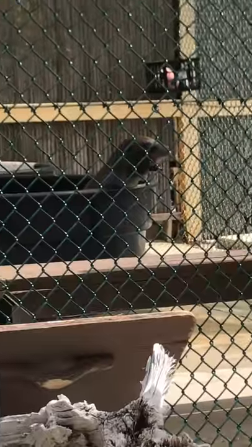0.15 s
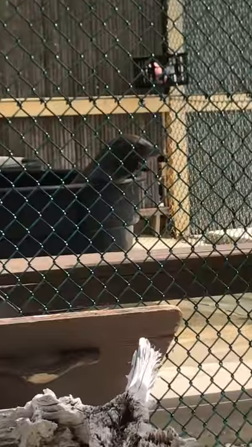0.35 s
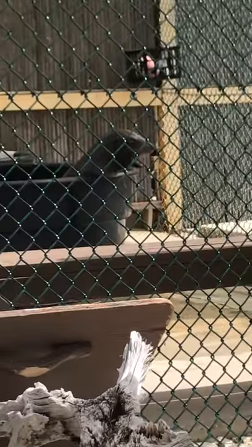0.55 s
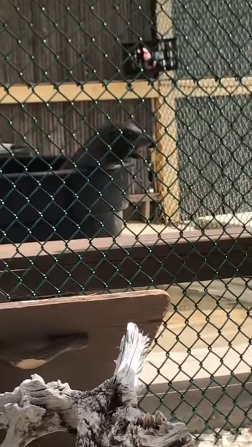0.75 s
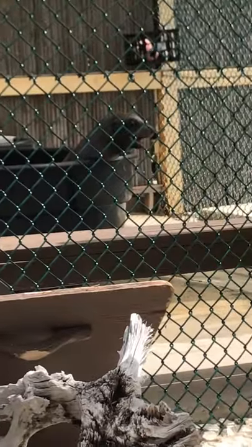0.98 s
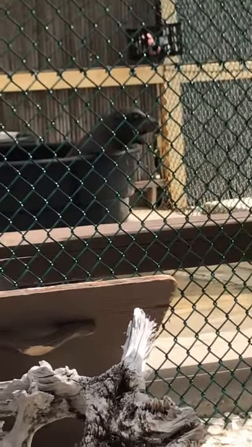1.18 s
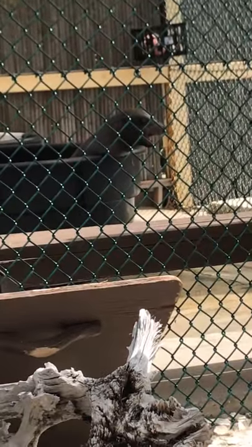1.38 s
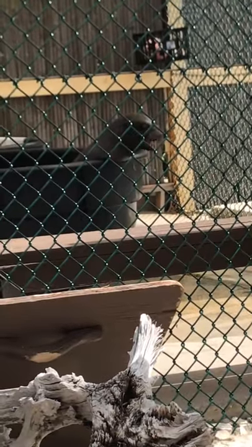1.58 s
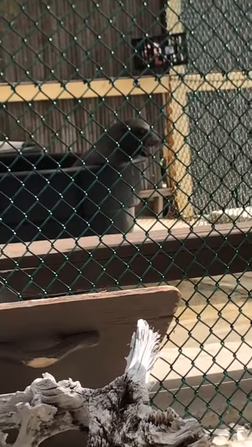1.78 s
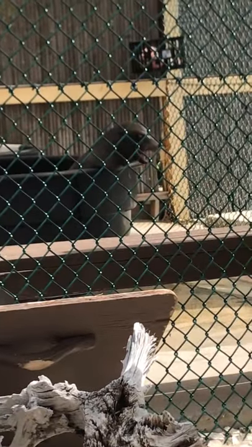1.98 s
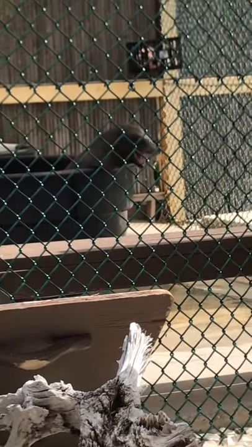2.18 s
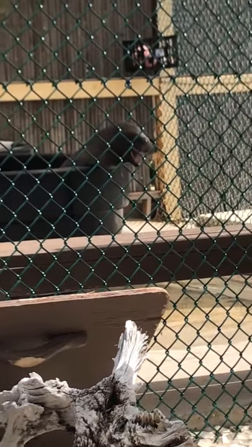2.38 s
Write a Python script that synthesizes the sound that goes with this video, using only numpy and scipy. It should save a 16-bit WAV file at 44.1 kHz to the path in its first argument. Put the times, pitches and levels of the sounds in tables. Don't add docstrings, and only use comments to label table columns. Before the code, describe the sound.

A sea lion gives five short, hoarse barks outdoors while wind buffets the microphone

```python
import sys
import numpy as np
from scipy import signal
from scipy.fft import rfft, irfft
from scipy.io import wavfile
from scipy.ndimage import uniform_filter1d

SR = 44100
rng = np.random.default_rng(int(sys.argv[2]) if len(sys.argv) > 2 else 0)


def inscribe(sig):
    pcm = np.round(np.clip(np.atleast_2d(sig).T, -1, 1) * 32767)
    wavfile.write(sys.argv[1], SR, pcm.astype(np.int16))


def undo_db(level):
    steps = np.asarray(level, float) / 20
    return 10 ** steps


N = 108045


def evened(x):
    return x / np.sqrt(np.mean(x ** 2) + 1e-20)


def read(points, hz):
    f, value = np.transpose(points)
    return np.interp(np.log(hz + 1), np.log(f + 1), value)


def shaped(x, points):
    gain = undo_db(read(points, np.fft.rfftfreq(N, 1 / SR)))
    return evened(irfft(rfft(x, N) * gain, N)[:len(x)])


def slow(hz, size):
    f = np.fft.rfftfreq(N, 1 / SR)
    drift = irfft(rfft(rng.standard_normal(N)) / (1 + (f / hz) ** 4), N)
    return evened(drift)[:size]


def add(mix, s, sound):
    part = mix[round(s * SR):][:len(sound)]
    part += sound[:len(part)]


def resonate(x, hz, width):
    turn = np.exp(2j * np.pi * np.cumsum(hz * np.ones(len(x))) / SR)
    r = np.exp(-np.pi * width / SR)
    return 2 * (turn * signal.lfilter([(1 - r) ** 2], [1, -2 * r, r * r], x / turn + 1e-18)).real


def yard():
    # frequency in Hz, density in dB per Hz.
    spectrum = [(35, -37), (60, -45), (236, -8), (521, -12.5), (613, -9), (1450, -14), (2530, -18),
                (5450, -22.5), (15500, -35.5)]
    level_db = -44.5
    hz, t, z = signal.stft(shaped(rng.standard_normal(N), spectrum), SR, nperseg=512)
    patches = uniform_filter1d(rng.standard_normal(z.shape), size=8, axis=0)
    patches = evened(uniform_filter1d(patches, size=10, axis=1))
    bed = signal.istft(z * undo_db(1.84 * patches), SR, nperseg=512)[1][:N]
    return undo_db(level_db + 1.0) * evened(bed)


def wind():
    # time in seconds, wind level in dB.
    gusts = [(0.0, -41), (0.15, -37), (0.46, -34.5), (0.78, -39.5), (0.84, -34), (1.0, -26), (1.061, -22),
             (1.12, -43), (1.32, -25.5), (1.41, -35.5), (1.472, -25), (1.62, -41), (1.669, -28),
             (1.73, -34), (1.78, -31.5), (2.07, -43.5), (2.12, -39), (2.45, -37.5)]
    # frequency in Hz, density in dB per Hz.
    rumble = [(20, -32), (35, -1), (60, 3.5), (120, -5.5), (250, -14.5), (500, -63), (1000, -80)]
    # start in seconds, peak in dB, length in ms.
    thumps = [(0.359, -23.5, 4.9), (0.426, -23.5, 8.5), (0.43, -16, 12), (0.474, -22, 10.7),
              (0.534, -22, 19.6), (0.803, -21, 20), (0.843, -16, 9), (0.914, -14, 11.6), (0.947, -19, 11.2),
              (0.998, -21.5, 3.2), (1.011, -15.5, 6.6), (1.035, -18, 14.7), (1.037, -22, 3.3),
              (1.063, -23, 2.26), (1.042, -16, 6.6), (1.055, -18, 7.9), (1.222, -22, 14),
              (1.25, -20.5, 10.7), (1.294, -24, 14.5), (1.312, -17.5, 4.85), (1.34, -14.5, 11.15),
              (1.322, -28, 3.1), (1.352, -22, 3.77), (1.363, -23, 11.4), (1.481, -27.5, 3.5),
              (1.465, -17, 7.5), (1.479, -15, 8.8), (1.495, -23, 5.9), (1.511, -20, 7.6),
              (1.665, -17.5, 20.6), (1.777, -23, 17.7)]
    lump_db, lump_hz = 2, 27.3
    rattle_db, rattle_growth = -9.5, 1
    wind_db = np.interp(np.arange(N) / SR, *np.transpose(gusts)) + lump_db * slow(lump_hz, size=N)
    rattle = evened(resonate(rng.standard_normal(N), 209.0, 320.0))
    rattle = rattle * undo_db(rattle_db + rattle_growth * (wind_db + 27.0))
    out = undo_db(wind_db - 1.0) * (shaped(rng.standard_normal(N), rumble) + rattle)
    for start, db, ms in thumps:
        u = np.arange(0, 1, 1000 / (ms * SR))
        add(out, start, undo_db(db) * np.sin(2 * np.pi * u ** 0.83) * np.sin(np.pi * u) ** .5)
    return out


def fold_pulses(hz, rough, sub):
    wobble_depth, wobble_hz, puff_floor = 0.24, 141.7, 0.14
    size = len(hz)
    wobble = slow(wobble_hz, size=size)
    wobble = wobble - uniform_filter1d(wobble, size=1300)
    turns = np.cumsum(hz * (1 + wobble_depth * rough ** 2 * wobble)) / SR
    buzz = sum(np.cos(2 * np.pi * k * turns) for k in range(1, 10))
    folds = evened(buzz * (1 + sub * np.cos(np.pi * turns)))
    puffs = evened((puff_floor + np.exp(-(turns % 1) / 0.31)) * rng.standard_normal(N)[:size])
    return folds, puffs


def bark(rows, sub, chest_db, hiss_db, rasp_db, throat_hz, throat_db, palate_db, first_db,
         grow_db, swell_s, span_s, swell_db):
    # centre in Hz, width in Hz, level in dB.
    palate_rows = [(3603, 330, 1.5), (4320, 310, -10), (4670, 750, -11)]
    # frequency in Hz, density in dB per Hz.
    hiss_spectrum = [(3500, -11), (5000, 0), (6300, 6), (7800, -4), (9000, -10), (10400, -13.5),
                     (11800, -13.5), (15500, -17.5)]
    chest_hz, chest_width, mouth_width, throat_width = 1000, 324, 224, 340
    rasp_hz, rasp_width = 2700, 2600
    chest_lag, throat_lag = 0.26, 0.29
    hiss_growth, hiss_rise_s = 0.19, 0.057
    snap_db, snap_s = 3, 0.06
    flutter_s, flutter_span_s, flutter_hz, flutter_db = 1.671, 0.025, 53.4, 3
    throb_hz, throb_db = 49, 2.47

    s, *columns = np.transpose(rows)
    t = np.arange(s[0], s[-1], 1 / SR)
    effort_db, hz, rough, mouth_hz = (np.interp(t, s, c) for c in columns)
    rough = np.clip(rough, 0, 1)
    slack_db = effort_db - effort_db.max()
    folds, puffs = fold_pulses(hz, rough, sub)

    voice = undo_db(rasp_db) * rough * resonate(rng.standard_normal(N)[:len(t)], rasp_hz, rasp_width)
    first_db = first_db + swell_db * np.exp(-((t - swell_s) / span_s) ** 2)
    voice = voice + undo_db(first_db - chest_lag * slack_db) * resonate(folds, hz, 48.0)

    bright_db = snap_db * np.exp(-np.maximum(t - s[1], 0) / snap_s)
    bright_db = bright_db + grow_db * (t - s[1]) * (1 - rough) ** 2
    for drive, widen in (((1 - rough) * folds, 1), (2.33 * rough * puffs, 1.7)):
        palate = np.zeros(len(t))
        for k, (f, width, db) in enumerate(palate_rows):
            palate += (-1) ** k * undo_db(db) * resonate(drive, f * throat_hz / 2700, width)
        throat = undo_db(throat_db) * resonate(drive, throat_hz, throat_width * widen)
        throat = throat + undo_db(palate_db + bright_db) * palate
        chest = undo_db(chest_db - chest_lag * slack_db) * resonate(drive, chest_hz, chest_width)
        mouth = resonate(drive, mouth_hz, mouth_width * widen)
        voice = voice + mouth + throat * undo_db(throat_lag * slack_db) - chest
    voice = voice / np.sqrt(uniform_filter1d(voice ** 2, size=900) + 1e-9)

    hiss = shaped(puffs, hiss_spectrum)
    hiss = hiss * undo_db(hiss_db + hiss_growth * slack_db + 2.0 * slow(20.0, size=len(t)))
    hiss = hiss * np.clip((t - s[1]) / hiss_rise_s, .5, 1)

    u = t - flutter_s
    flap_db = flutter_db * np.cos(2 * np.pi * flutter_hz * u) * np.exp(-(u / flutter_span_s) ** 4)
    flap_db = flap_db + throb_db * rough * slow(throb_hz, size=len(t))
    return s[0], (voice + hiss) * undo_db(effort_db + flap_db)


def sea_lion():
    # time in seconds, effort in dB, pitch in Hz, roughness from 0 to 1,
    # mouth resonance in Hz.
    first = [(.216, -50, 560, .7, 1700), (.228, -26, 562, .4, 1700), (.258, -24, 555, .36, 1680),
             (.286, -26, 570, .3, 1700), (.3, -30, 575, .6, 1750), (.362, -31, 600, .75, 1650),
             (.376, -28, 610, .85, 1500), (.384, -38, 610, .9, 1400), (.43, -52, 610, .9, 1400)]
    second = [(0.604, -64, 586.7, .6, 1740), (0.613, -21.5, 584.7, 0.53, 1810),
              (0.635, -22.5, 509, 0.24, 1640), (0.666, -18.5, 503, 0.16, 1530),
              (0.689, -15, 525.2, 0.022, 1580), (0.732, -24.5, 573.3, 0.28, 1680),
              (0.74, -22.5, 695, 0.27, 1400), (0.773, -29, 727, 0.59, 1610), (0.845, -52, 747, 0.22, 1540)]
    third = [(1.065, -55, 651.7, 0.29, 1820), (1.079, -22.5, 650, 0.41, 1730),
             (1.105, -24, 612.5, 0.26, 1770), (1.132, -21, 583.8, 0.31, 1770),
             (1.141, -22, 647.4, 0.23, 1510), (1.197, -23.5, 664.8, 0.18, 1490),
             (1.235, -31, 671, 0.8, 1510), (1.296, -33.5, 571.3, 0.98, 1780), (1.36, -60, 500, 0.73, 1510)]
    fourth = [(1.585, -68, 599, 0.57, 1680), (1.593, -31.5, 594.3, 0.85, 1680),
              (1.612, -21, 621.3, 0.64, 1870), (1.624, -19.5, 679.7, 0.22, 1470),
              (1.661, -21, 697.4, 0.39, 1430), (1.691, -21, 697.6, 0.37, 1490), (1.707, -28, 691, .8, 1760),
              (1.736, -39.5, 621, 0.75, 1720), (1.779, -71, 548, 1, 1528)]
    fifth = [(2.003, -42, 666, 0.84, 1730), (2.011, -21.5, 630, 0.63, 1630), (2.03, -22.5, 626, 0.75, 1700),
             (2.052, -18, 554.7, 0.13, 1630), (2.077, -15, 555.3, 0.13, 1690),
             (2.127, -17, 558.7, 0.16, 1642), (2.15, -20, 577.2, 0.27, 1720),
             (2.215, -35.5, 557.7, 1, 1700), (2.26, -42.5, 531, 0.71, 1587)]
    subs = [.1, .35, .05, .08, .04]
    # chest in dB, breath hiss in dB, rasp in dB.
    manners = [(-4.5, -20.5, -13), (-4.5, -20.5, -6.5), (-6.5, -17.5, -27), (-7.5, -25, -9),
               (-12, -19, -14)]
    # throat resonance in Hz, throat in dB, palate in dB, fundamental in dB.
    throats = [(2590, -5, -20, -18.5), (2686, -4, -25, -21), (2535, 0, -16.5, -17.5),
               (2792, 0.5, -17, -17.5), (2746, -0.5, -10, -20.5)]
    growths = [0, 130, 0, 0, 0]
    # centre in seconds, span in seconds, rise in dB.
    swells = [(.285, 0.036, 6), (.655, 0.024, 4), (1.17, 0.025, 12.5), (1.665, 0.042, 3), (2.1, 0.11, 4.5)]
    out = np.zeros(N)
    barks = (first, second, third, fourth, fifth)
    for rows, sub, manner, throat, grow, swell in zip(barks, subs, manners, throats, growths, swells):
        add(out, *bark(rows, sub, *manner, *throat, grow, *swell))
    return out


def pen(x):
    # frequency in Hz, time to fall by 60 dB in seconds.
    decay = [(500, 0.32), (1000, 0.16), (3000, 0.16), (8000, 0.1)]
    taps = np.zeros(SR // 2)
    at = np.arange(300, SR // 2 - 20, 20)
    taps[at + rng.integers(0, 20, len(at))] = rng.choice([-1., 1.], len(at))
    hz, t, z = signal.stft(taps, SR, nperseg=256)
    fade = undo_db(-60 * t / np.maximum(read(decay, hz), .02)[:, None])
    tail = signal.istft(z * fade, SR, nperseg=256)[1]
    return undo_db(-11) * signal.fftconvolve(x, tail / np.linalg.norm(tail))[:N]


def airs(rows, width, grain_db):
    out = np.zeros(N)
    t = np.arange(-4000, 14000) / SR
    for s, swell, fade, db, hz in rows:
        shape = np.exp(-np.where(t < 0, (t / swell) ** 2, abs(t) / fade))
        noise, grain = rng.standard_normal((2, len(t)))
        air = evened(resonate(resonate(noise, hz, width * hz), hz, 2 * width * hz))
        grain = evened(uniform_filter1d(uniform_filter1d(grain, size=200), size=200))
        add(out, s + t[0], undo_db(db + grain_db * grain) * shape * air)
    return out


def grunts():
    # peak in seconds, swell in seconds, fade in seconds, level in dB, centre in Hz.
    notes_of_chest = [
        (.232, 0.013, 0.007, -29, 1146),
        (.376, 0.034, 0.0055, -30, 820),
        (.392, 0.0073, 0.034, -35, 870),
        (.775, 0.019, 0.047, -33, 972),
        (1.265, .015, 0.036, -31, 938),
        (1.35, 0.041, 0.034, -46, 969),
        (1.605, .01, 0.011, -33, 1000),
        (1.715, 0.024, 0.017, -30.5, 940),
        (1.75, .01, .04, -43, 980),
        (2.19, 0.032, 0.029, -32.5, 944),
    ]
    return airs(notes_of_chest, 0.15, 0.5)


def breaths():
    # peak in seconds, swell in seconds, fade in seconds, level in dB, centre in Hz.
    rushes = [(.3, 0.033, .05, -57, 11900), (.325, .02, 0.044, -49.5, 5650),
              (.63, 0.0089, 0.04, -42.5, 6440), (.655, 0.03, 0.025, -48, 11500),
              (.655, 0.017, .02, -47, 8000), (.74, .04, .03, -58, 13000),
              (1.085, .008, 0.077, -51.5, 11900), (1.085, .008, 0.024, -35.5, 4480),
              (1.12, .008, 0.043, -42, 6640), (1.17, 0.034, .05, -47, 5430), (1.15, .03, 0.062, -56, 13900),
              (1.625, 0.016, 0.054, -36, 4620), (1.68, 0.045, 0.052, -37.5, 3790),
              (1.73, .03, .02, -40, 3000), (1.65, 0.035, 0.039, -38, 2114), (1.27, 0.045, 0.027, -39, 2300),
              (.235, 0.011, 0.032, -49, 4050), (1.61, 0.0049, .08, -57.5, 12500),
              (2.012, 0.0037, 0.024, -39, 4450), (2.031, .003, .006, -43, 7400),
              (2.05, 0.0028, 0.011, -32, 7400), (2.05, .03, 0.033, -53, 13400),
              (2.135, 0.023, 0.043, -39.5, 7100)]
    return airs(rushes, 0.16, 3)


def fence():
    # start in seconds, level in dB, ring in Hz.
    ticks = [
        (0.399, -49, 13000),
        (1.5434, -54, 13500),
        (1.82, -35, 7250),
        (1.9, -43.5, 6540),
    ]
    out, t = np.zeros(N), np.arange(900) / SR
    for start, db, hz in ticks:
        burst = rng.standard_normal(len(t)) * np.minimum(t / 0.00033, 1) * undo_db(-60 * t / 0.028)
        add(out, start, undo_db(db) * (3 * resonate(burst, hz, 3600.0) + 0.9 * np.gradient(burst)))
    return out


def scene():
    around = yard() + wind()
    voice = sea_lion()
    animal = voice + pen(voice) + grunts() + breaths()
    return (around + animal + fence())[None]


def top_cut(x):
    return signal.sosfilt(signal.butter(12, 15820, fs=SR, output="sos"), x)


def record(dry):
    # centre in Hz, width in Hz, depth in dB.
    dips = [(7530, 170, -3), (10780, 300, -4.5)]
    low_hz, high_hz = 45, 15800
    hz = np.fft.rfftfreq(N, 1 / SR)
    dips_db = sum(db * np.exp(-((hz - f) / width) ** 2) for f, width, db in dips)
    limited = irfft(rfft(dry) * undo_db(dips_db) * (hz < high_hz), N)
    mix = signal.lfilter(*signal.butter(3, low_hz, "high", fs=SR), limited)
    return top_cut(mix)


dry = scene()
out = record(dry)
inscribe(out)
```